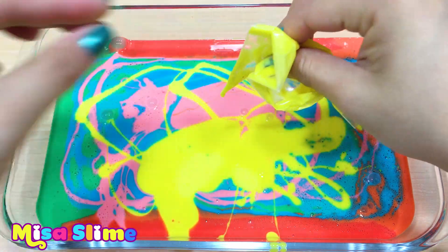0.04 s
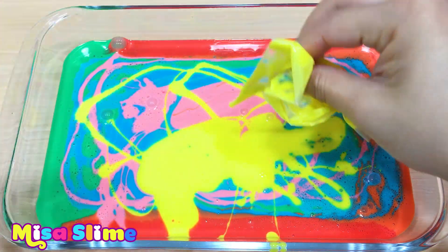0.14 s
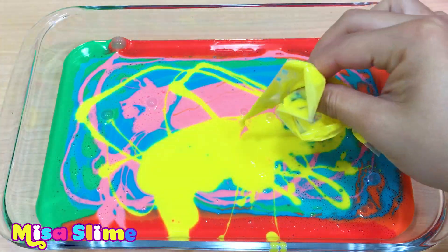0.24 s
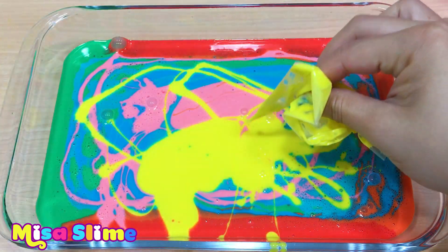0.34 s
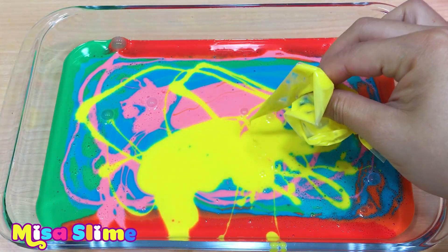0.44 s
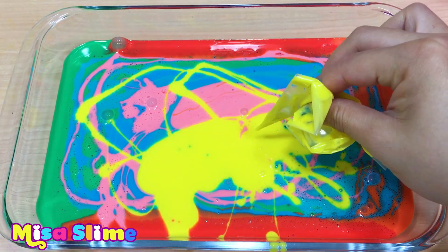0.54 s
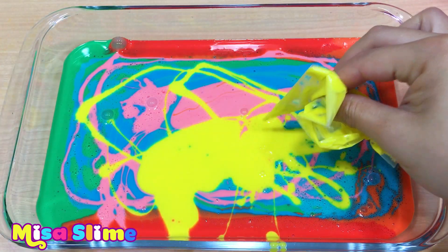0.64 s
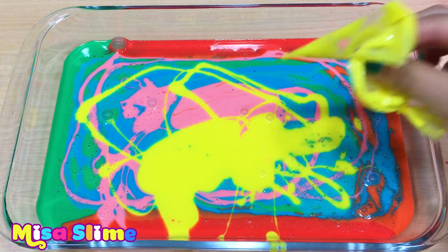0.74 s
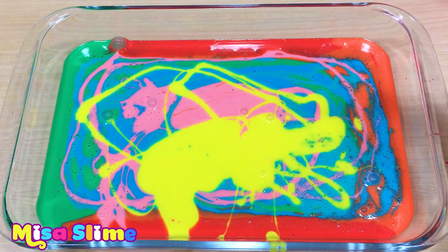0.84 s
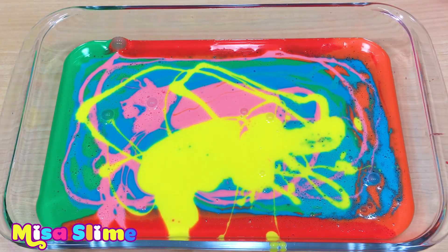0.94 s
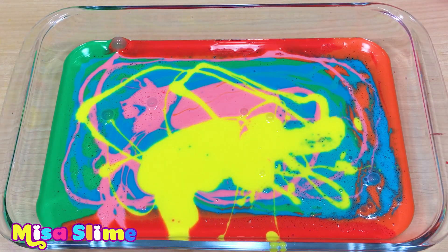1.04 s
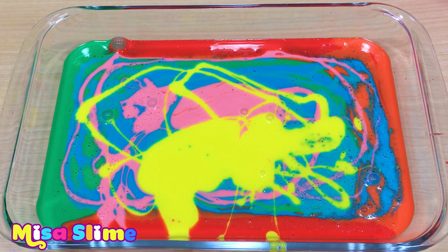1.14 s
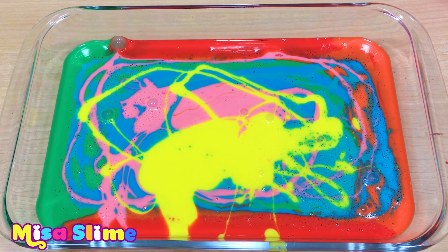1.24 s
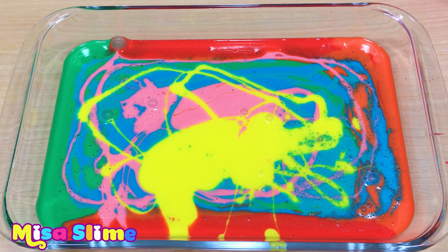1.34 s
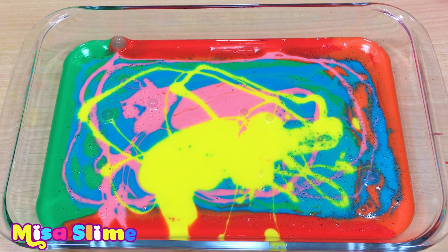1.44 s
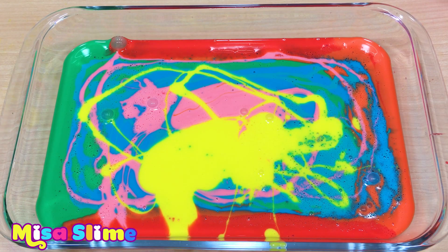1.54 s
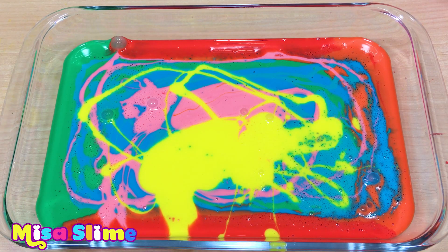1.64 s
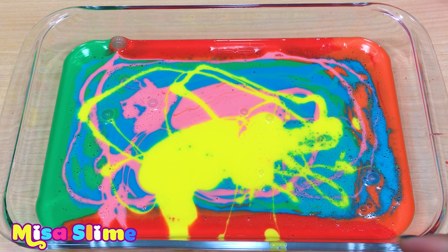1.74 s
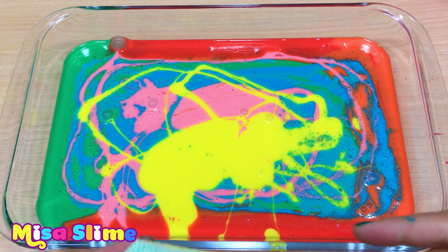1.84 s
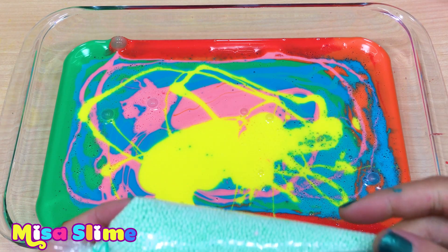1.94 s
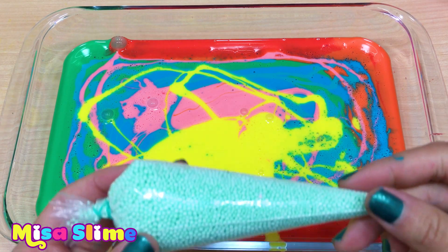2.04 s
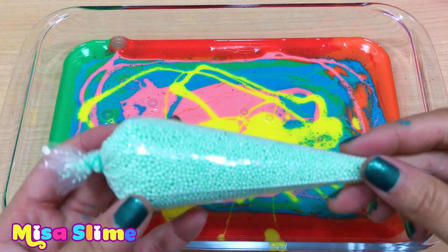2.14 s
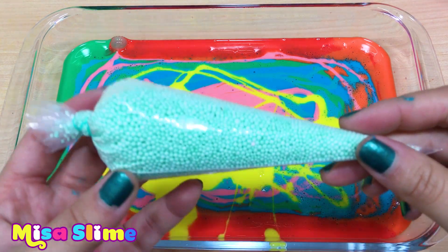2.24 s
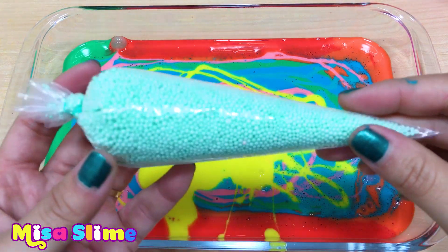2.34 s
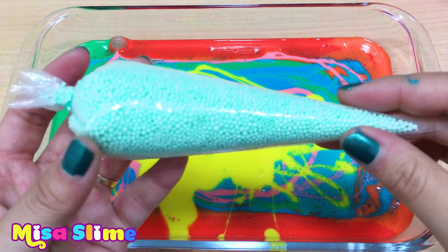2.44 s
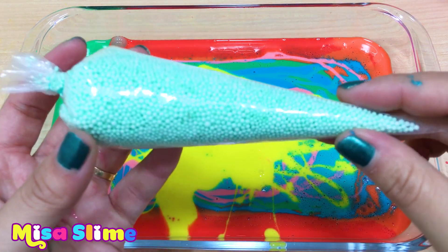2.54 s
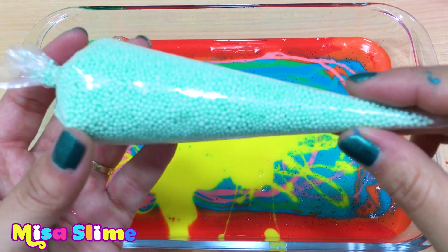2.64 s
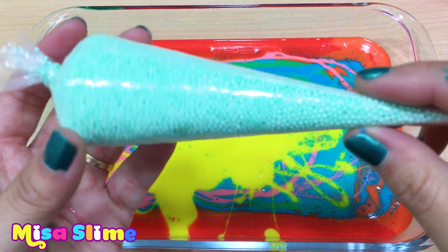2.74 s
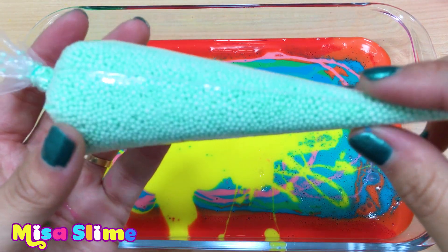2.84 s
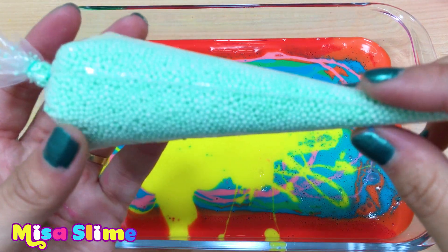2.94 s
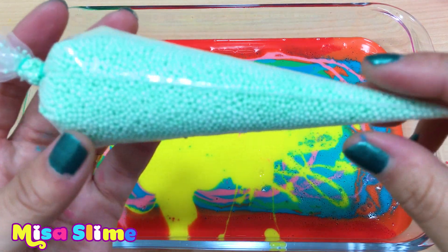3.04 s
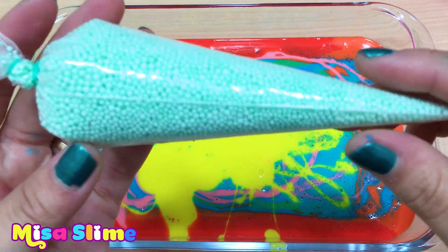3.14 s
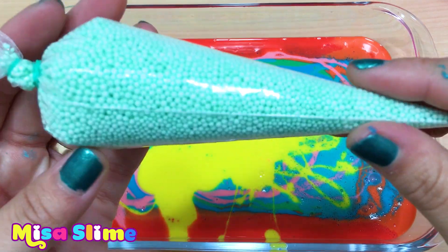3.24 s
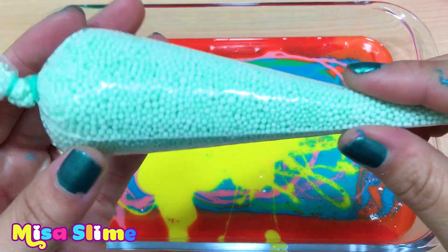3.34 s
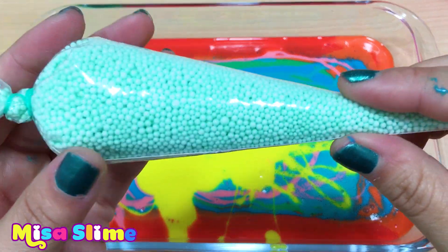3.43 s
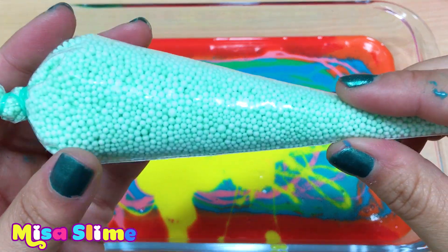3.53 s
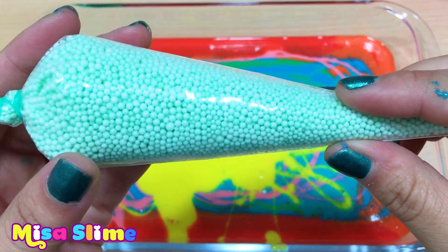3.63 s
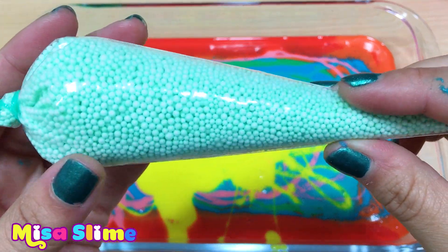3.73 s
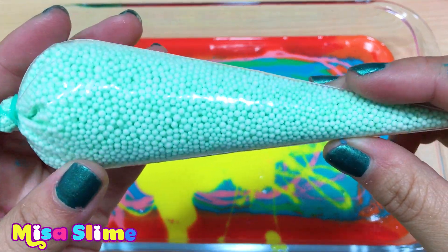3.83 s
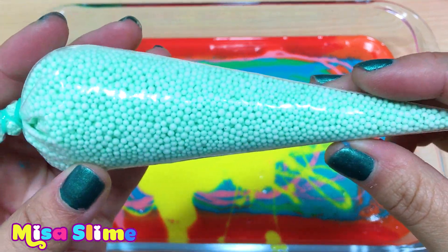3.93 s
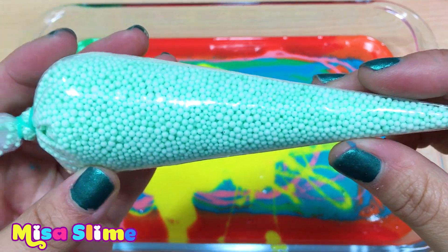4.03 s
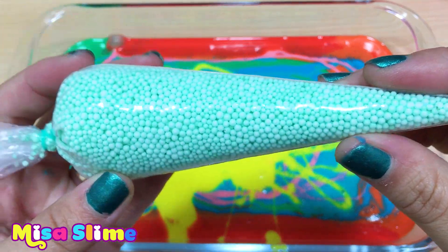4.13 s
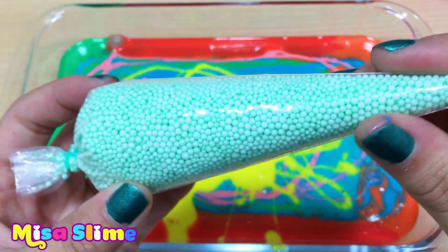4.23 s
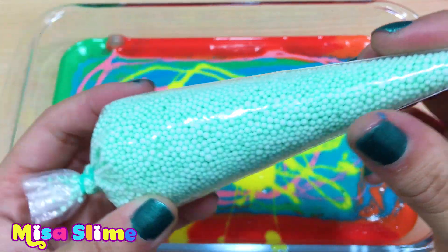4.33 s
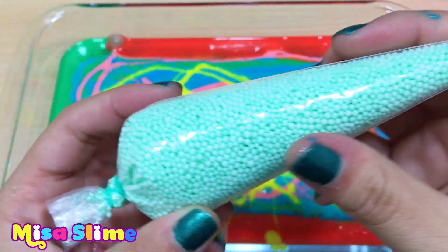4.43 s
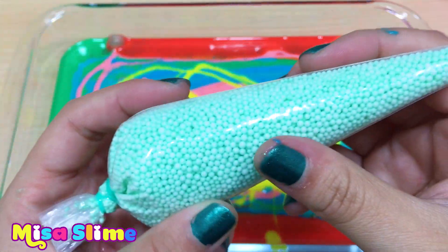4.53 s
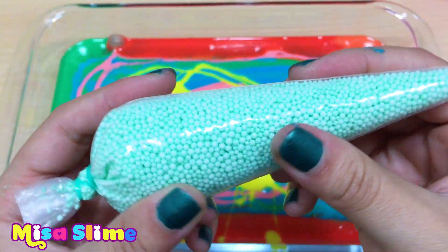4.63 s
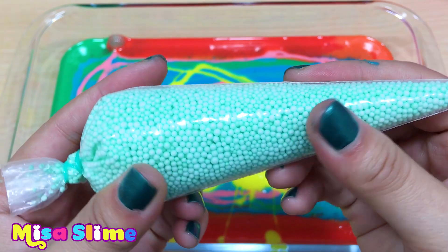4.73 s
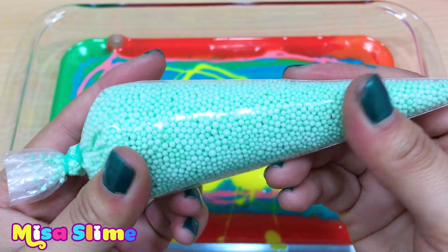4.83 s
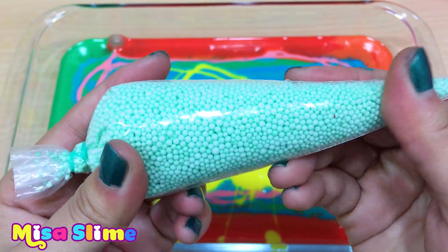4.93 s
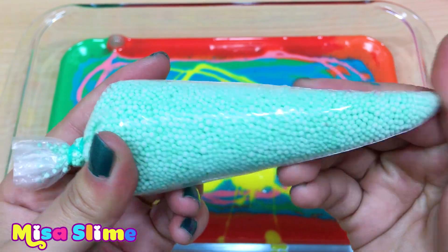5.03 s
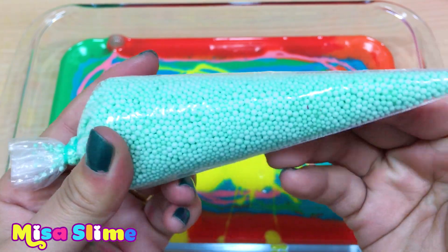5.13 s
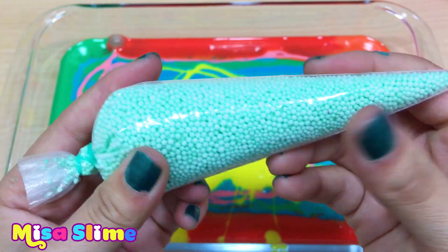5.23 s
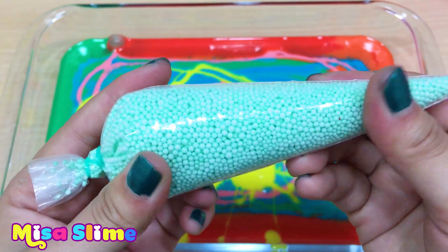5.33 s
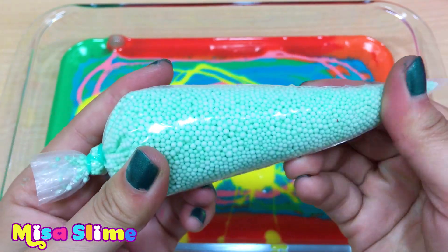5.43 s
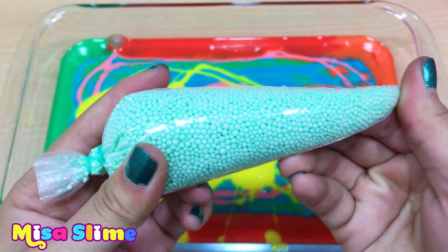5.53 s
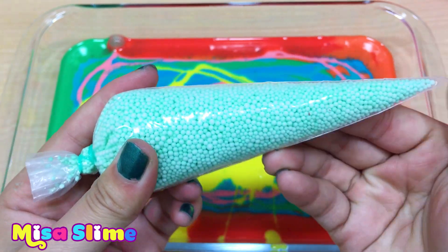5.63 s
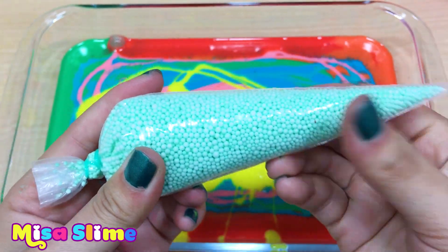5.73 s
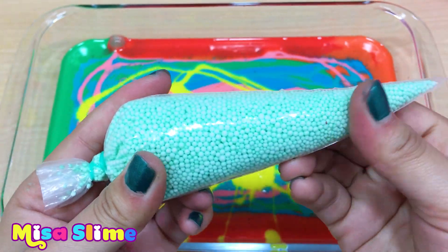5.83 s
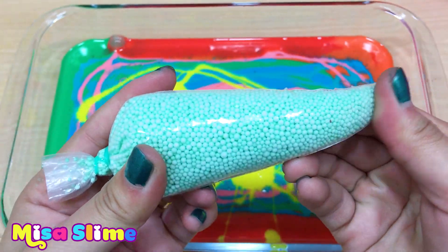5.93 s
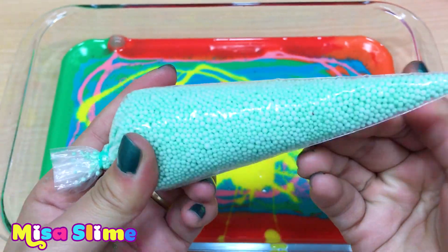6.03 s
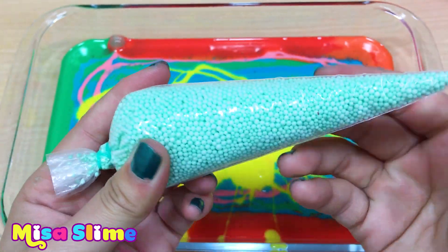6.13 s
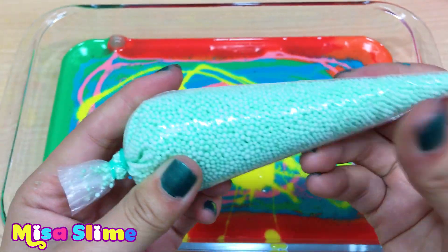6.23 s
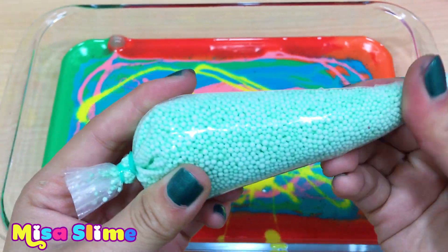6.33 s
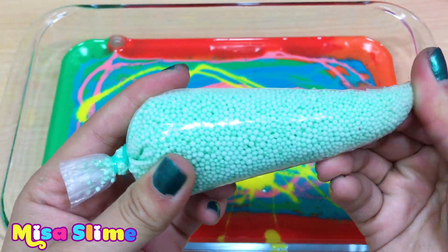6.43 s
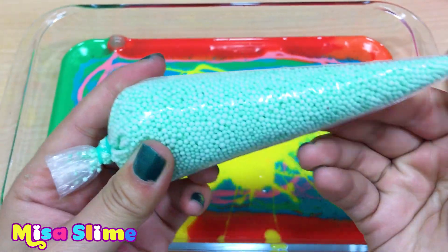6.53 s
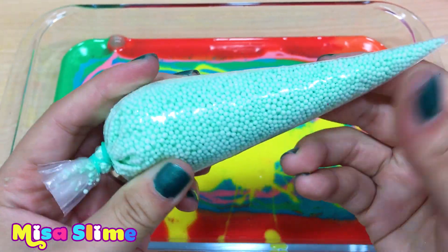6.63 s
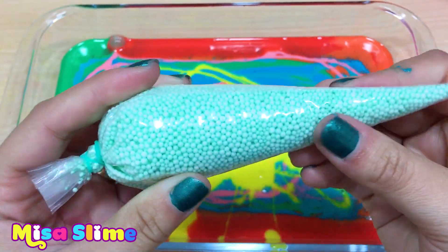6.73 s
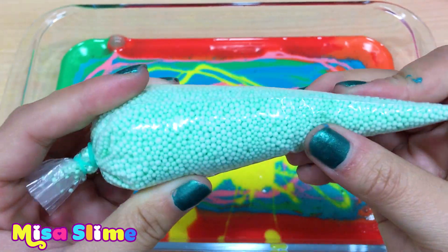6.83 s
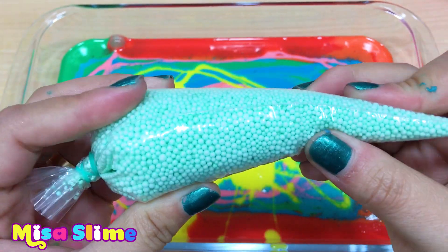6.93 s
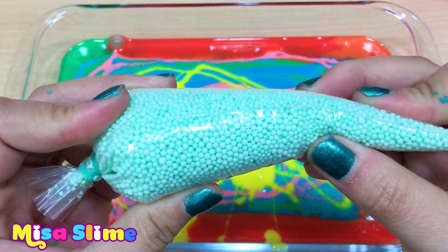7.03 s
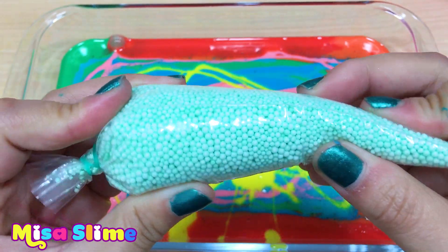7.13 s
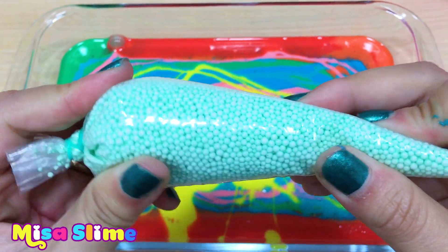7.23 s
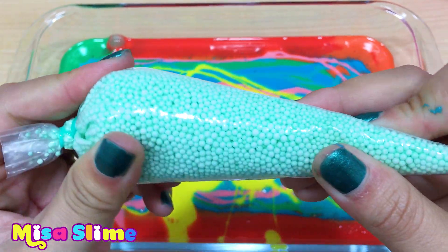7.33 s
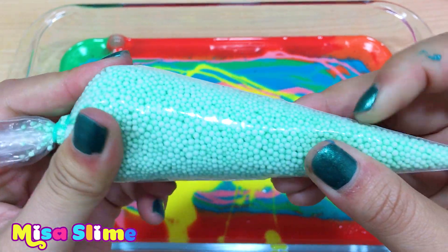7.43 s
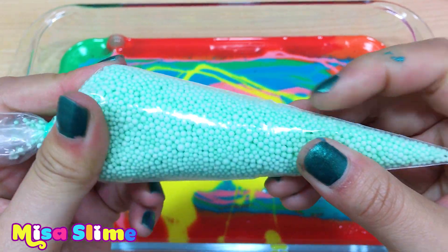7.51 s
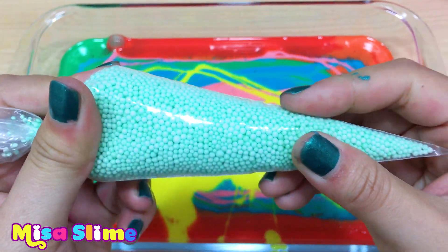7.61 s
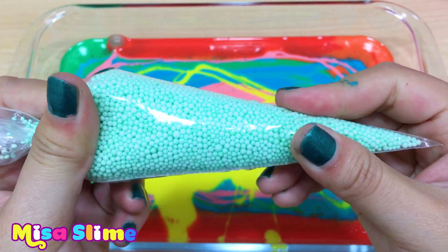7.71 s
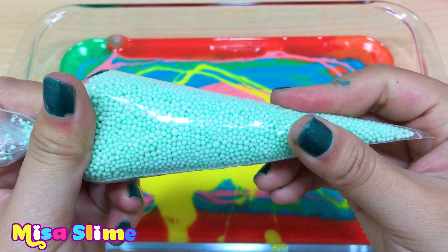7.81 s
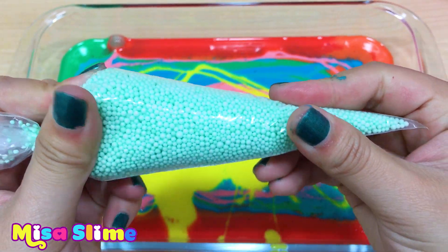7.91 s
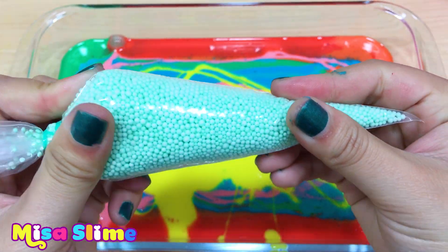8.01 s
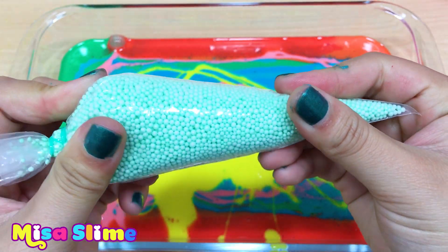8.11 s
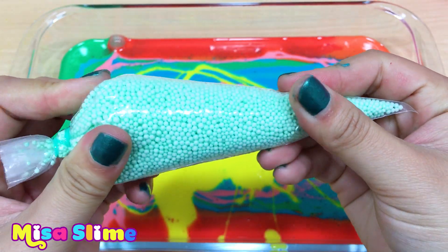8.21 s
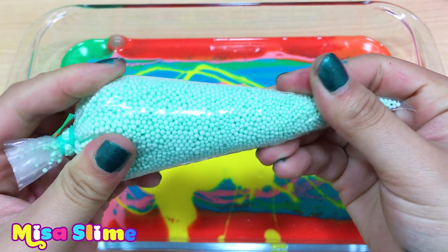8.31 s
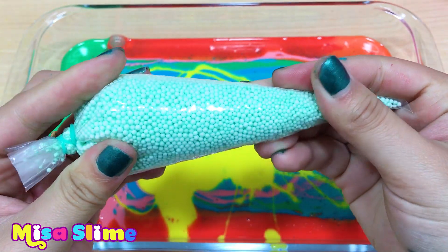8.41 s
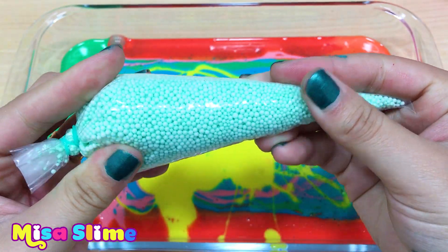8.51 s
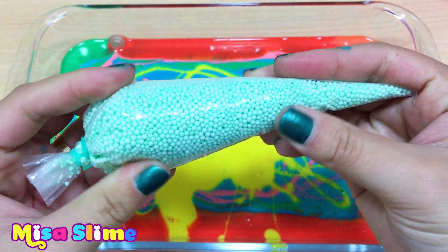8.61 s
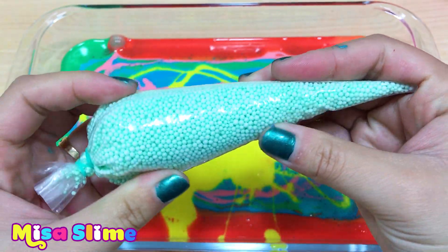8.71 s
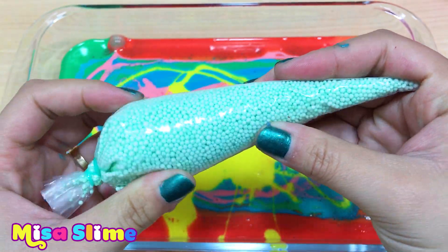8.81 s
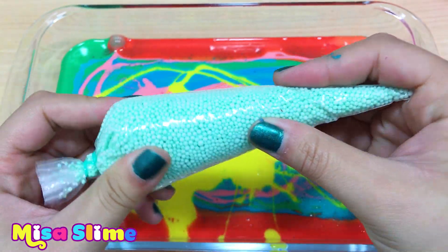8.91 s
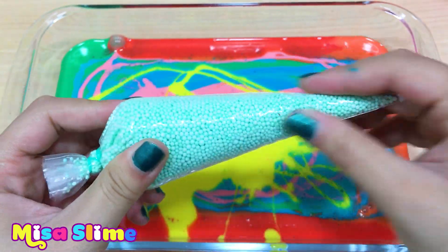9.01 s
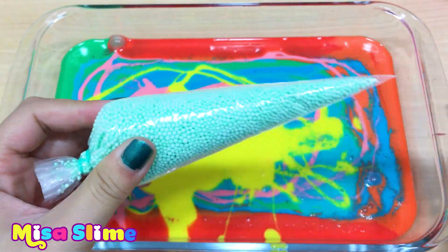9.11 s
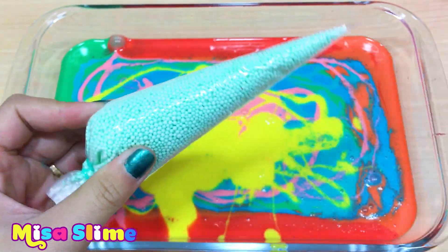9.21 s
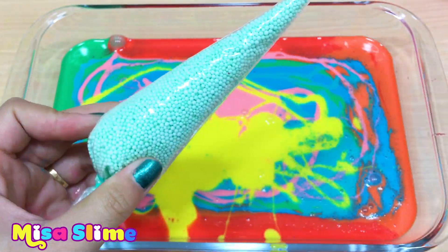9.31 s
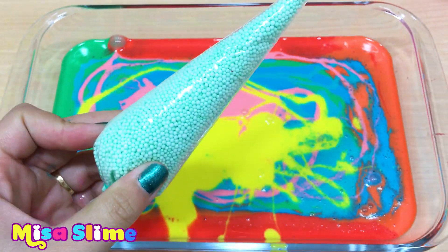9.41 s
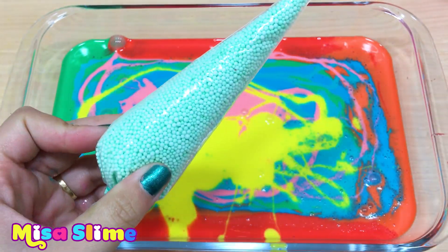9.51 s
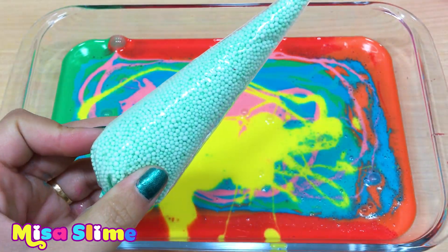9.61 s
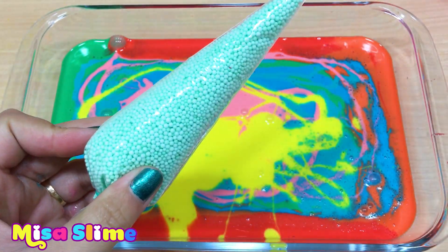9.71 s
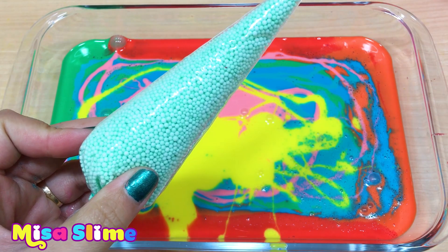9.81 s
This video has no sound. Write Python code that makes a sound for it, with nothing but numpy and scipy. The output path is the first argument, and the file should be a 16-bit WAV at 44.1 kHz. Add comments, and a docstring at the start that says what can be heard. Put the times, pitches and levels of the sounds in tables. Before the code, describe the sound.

A close, mostly dry sound in a small, quiet room with very faint steady air. From 0 to 0.5 s, an emptied thin plastic bag gives faint crisp crackles and tiny skids, then near silence, with only whisper-soft brushes around 1.3 and 1.6 s. At 2.3-2.6 s a packed bead bag arrives with a light rustle and short squeaky skids; sparse soft strokes continue to 4 s. From 4 s the crinkling becomes denser and brighter, with gritty foam-bead crunch, squeaks and sharp snaps. A loud, short hollow thump with a scrape hits at 5.3 s, lesser knocks at 5.4 and 5.8, then strong pops at 6.24, 6.42 and 6.71, with a bright crack near 6.1. A narrow ringing squeak peaks around 7.1. From 7.4 to 9.5 busy crackle and rubbing continue, with a brief low groan of shifting beads at 9.3. Rubbing cuts off at 9.6, leaving quiet and a faint dull rumble.

```python
"""Foam beads crunch and squeak inside taut plastic film as hands, close up, put away an emptied piping bag,
then turn and squeeze a packed one. Friction is shaped noise grains; the film crackles with tiny decaying sines.
Creases snap as noise cracks with ringing facets; a slipping finger is a hollow, pitch-dropping thump and a scrape.
Short skids, a narrow bag resonance and low rumbles are filtered noise.
A small, quiet room adds a decaying noise reverb and steady air."""
import sys
import numpy as np
from scipy import signal
from scipy.fft import rfft, irfft, next_fast_len
from scipy.io import wavfile
from scipy.ndimage import uniform_filter1d, map_coordinates

SR = 44100
rng = np.random.default_rng(int(sys.argv[2]) if len(sys.argv) > 2 else 0)


def wav_record(signal):
    """Record a signal, one row per channel, as 16-bit PCM in the file named by sys.argv[1]."""
    frames = np.transpose(np.atleast_2d(signal))
    bounded = np.clip(frames, -1, 1)
    # unit amplitude maps onto the largest positive 16-bit level
    quanta = np.round(bounded * 32767).astype(np.int16)
    wavfile.write(sys.argv[1], SR, quanta)


N = 434826  # length in samples

# Room air spectrum. Each row: frequency in Hz, relative level in dB.
AIR_SPECTRUM = [(13, -64), (22, -32), (36, -9), (59, -3), (132, -8), (152, -9), (200, -11), (524, -18),
                (730, -22), (792, -23), (3420, -31), (5030, -29.5), (6100, -34.5), (7810, -32.5),
                (16000, -42.5)]
AIR_DB = -65.5
# Reverb decay. Each row: frequency in Hz, time to fall 60 dB in seconds.
ROOM_DECAY = [(100, 0.86), (300, 0.72), (2000, 0.51), (6000, 0.27), (15000, 0.084)]
# Colour of the wall reflections. Each row: frequency in Hz, relative level in dB.
WALL_COLOUR = [(60, -21), (150, -1.5), (230, -5), (380, 1.5), (600, 1.5), (900, 3), (1800, 1), (5000, 1.5),
               (15000, -4)]

# Hands shift with a dull rumble. Each row: middle in seconds, level in dB, half length in seconds.
SHIFTS = [(4.25, -69, 0.47), (5.92, -61, 0.15), (7.195, -63, 0.24), (7.75, -67, 0.38), (9.726, -61, .18)]
# The whole bead packing gives way with a groan: middle in seconds, level in dB, half length in seconds.
SLUMP = (9.315, -51.5, 0.046)
# Rumble of the shifting hands. Each row: frequency in Hz, relative level in dB per Hz.
RUMBLE_SPECTRUM = [(30, -33), (60, -2), (120, 5), (170, -14.5), (400, -32), (2000, -38)]
# Groan of the slumping beads. Each row: frequency in Hz, relative level in dB per Hz.
GROAN_SPECTRUM = [(100, -26), (230, -3), (480, -0.5), (800, -10), (1500, -2), (4000, -37)]

# The packed bag's narrow resonance, higher as it is squeezed tighter.
# Each row: time in seconds, level in dB, centre frequency in Hz.
BAG_RING = [(0, -105, 2780), (1.3, -86, 2750), (2.35, -77.5, 2685), (2.8, -81, 2750), (3.03, -74.5, 2780),
            (3.4, -75.5, 2733), (4.7, -64, 2776), (5.4, -75, 2795), (6.8, -77, 2950), (7.12, -59, 3046),
            (7.3, -73, 3060), (9.3, -73.5, 3060), (9.7, -97, 3120)]
BAG_LOWPASS_HZ, BAG_FLICKER_DB = 230, 4  # reach to either side of the centre, depth of the flicker

# The film skids and chatters.
# Each row: middle in seconds, level in dB, ringing frequency in Hz, half length in seconds.
SKIDS = [(0.086, -61, 4970, 0.036), (0.103, -67, 3830, 0.03), (0.163, -64.5, 2420, 0.017),
         (2.394, -59, 2640, 0.016), (2.525, -56, 4300, 0.0058), (2.555, -52.5, 4160, 0.0073),
         (3.155, -56.5, 2750, 0.006), (4.848, -51, 4700, 0.025), (5.429, -39, 4630, .0015),
         (5.831, -41.5, 3450, 0.0022), (7.04, -48, 7700, 0.026), (7.657, -44, 4150, 0.0069),
         (7.684, -38, 3160, 0.0077), (9.214, -49.5, 1780, 0.011), (9.307, -43, 2900, .012)]

# A finger slips off a bag or knocks it. Each row: release in seconds, thump level in dB, settled pitch in Hz,
# decay constant in seconds, hollow overtone level in dB, scrape level in dB, slide build-up in seconds.
THUMPS = [(0.4541, -53, 254, 0.0014, -43, -81, .004), (5.3008, -13.5, 310, 0.0011, -59, -24.5, 0.012),
          (5.4281, -33.5, 656, 0.00072, -51, -33.5, 0.014), (5.8312, -38, 263, 0.0026, -61, -29.5, 0.026),
          (6.2416, -15, 211, 0.0018, -16.5, -22.5, 0.014),
          (6.421, -17.5, 290, 0.0012, -16.5, -23.5, 0.0064), (6.7116, -15, 209, 0.0015, -21, -21.5, 0.0093)]
# Scrape of the slipping finger. Each row: frequency in Hz, relative level in dB per Hz.
SCRAPE_SPECTRUM = [(150, 4.5), (700, 1.5), (2000, 4.5), (4000, 4), (5600, -7.5), (7500, 4), (11000, -2),
                   (12500, -2), (16000, 2.5)]
SETTLE_DB, SETTLE_S = -41.5, 0.17  # beads resettle after a thump: level relative to it, decay constant

# The loudest creases snapping through.
# Each row: time in seconds, crack level in dB, pitch of the buckling facet in Hz, facet ring level in dB.
SNAPS = [(0.0403, -50, 4020, -50), (0.1008, -70, 4800, -47.5), (0.146, -63, 3780, -56.5),
         (0.2081, -50.5, 3940, -52.5), (0.2838, -49.5, 2350, -58), (0.3697, -64, 1720, -62),
         (0.455, -69, 2200, -51), (2.9918, -52.5, 3010, -58), (3.0223, -50, 2730, -54),
         (3.126, -75, 2736, -57), (3.155, -56, 2720, -57), (4.0573, -37, 2980, -43.5),
         (4.133, -54, 8240, -47), (4.2758, -47, 3630, -48), (4.4875, -42, 3620, -54),
         (4.509, -32.5, 3100, -37), (4.83, -36.5, 4300, -44), (4.8397, -53, 6170, -33.5),
         (5.1785, -42, 6100, -41), (5.2132, -59, 11460, -44), (5.4292, -42, 2070, -34),
         (5.5312, -41.5, 1200, -45), (5.6154, -47, 6120, -60), (5.852, -44, 3240, -48.5),
         (6.0051, -42.5, 1040, -47.5), (6.0354, -47, 2330, -54), (6.122, -25.5, 7500, -27.5),
         (6.523, -48, 2560, -44), (6.6271, -46, 1710, -48.5), (6.8219, -34, 1960, -25.5),
         (6.842, -37, 1490, -32.5), (6.9383, -49, 1477, -46.5), (7.022, -34.5, 8000, -39),
         (7.0288, -43, 8200, -30), (7.0342, -38, 7410, -50), (7.0626, -44, 6060, -38),
         (7.4112, -44.5, 7500, -45), (7.4893, -37, 5900, -36), (7.803, -43.5, 7410, -49),
         (7.8677, -42.5, 7490, -49), (7.9224, -41, 4530, -36), (7.9327, -37, 9350, -46),
         (7.9954, -40, 7030, -46), (8.0207, -42.5, 10680, -44), (8.0443, -32.5, 4250, -34.5),
         (8.0598, -45, 3620, -56), (8.1399, -44, 5100, -44), (8.1933, -41, 7970, -37.5),
         (8.2972, -58, 6460, -44), (8.4139, -47, 6800, -45.5), (8.574, -37.5, 3620, -41.5),
         (8.5275, -44, 8480, -41), (8.6241, -59, 1040, -50.5), (8.652, -42, 8050, -42),
         (8.6835, -44, 3860, -48.5), (8.6912, -65, 1070, -51.5), (8.9392, -45, 3880, -47),
         (8.958, -39, 3880, -44), (8.9661, -36, 3960, -42.5), (9.0085, -54, 1800, -35.5),
         (9.0285, -38.5, 2000, -37.5), (9.1482, -37.5, 1930, -41.5), (9.2746, -34, 1820, -37.5),
         (9.2984, -35, 10510, -42), (9.307, -40, 3930, -35), (9.3437, -36, 4060, -40),
         (9.4177, -49, 6540, -37.5), (9.4242, -39, 6400, -38.5), (9.4286, -36, 5600, -38),
         (9.4326, -40, 3980, -39)]
# Colour of the cracks. Each row: frequency in Hz, relative level in dB per Hz.
CRACK_SPECTRUM = [(150, -19), (700, -34), (1500, -4), (4000, 3.5), (5600, -3), (7400, 6), (9000, -2.5),
                  (10700, 5), (12400, -1), (13600, -10), (16000, 3)]
# Lesser creases go at random times, at levels that follow the film rub.
TICKS_PER_S, TICK_OVER_RUB_DB, TICK_SPREAD_DB = 8, -2.5, 2.5
TICK_LOW_HZ, TICK_HIGH_HZ = 2000, 9800

# The film's steady rub in the holding hand. Each row: time in seconds, level before the film trim in dB.
GRIP = [(0, -66.5), (0.4, -77.5), (1.2, -83.5), (2.2, -78), (2.5, -63.5), (2.7, -74), (3.3, -70.5),
        (4.2, -59.5), (5.1, -58), (5.45, -62), (5.95, -62), (6.9, -57.5), (7.28, -58), (7.8, -52),
        (8.15, -59.5), (8.9, -53), (9.4, -53.5), (9.59, -62.5)]
RUB_END_S = 9.6  # the steady rub cuts off here, in a 10 ms fade
# A finger slides along the film.
# Each row: start in seconds, length in seconds, level before the film trim in dB, bead pressure in dB.
STROKES = [(0.02, 0.069, -83, 7), (0.46, .07, -83, 19.5), (1.334, 0.076, -73.5, 7.5),
           (1.604, 0.24, -74.5, 5), (2.276, 0.083, -66, -9), (2.386, .03, -60.5, 6),
           (2.527, 0.047, -58.5, 0.5), (2.92, .015, -67, 4), (2.987, 0.037, -65, 3), (3.215, .015, -69, -6),
           (3.514, 0.069, -58.5, -1.5), (3.614, 0.065, -65, -6), (3.776, 0.052, -59, 2.5),
           (3.926, .07, -76, -15), (4.048, 0.014, -57, -1), (4.393, .04, -55.5, 2.5),
           (4.467, 0.07, -53.5, 4), (4.605, 0.12, -59.5, 2), (4.697, 0.075, -52, -2.5),
           (4.835, 0.029, -46.5, -2), (4.887, 0.16, -50.5, -1.5), (5.056, 0.15, -54.5, -22),
           (5.24, .03, -52.5, -2), (5.272, 0.022, -44.5, 2), (5.527, 0.089, -57.5, 3),
           (5.697, 0.15, -58, 0), (6.12, 0.079, -49, -18), (6.222, 0.019, -44, 1.5), (6.361, 0.066, -55, 4),
           (6.511, 0.022, -52, 7), (6.555, 0.05, -56.5, -6), (6.696, 0.017, -46.5, -3),
           (6.815, 0.054, -53.5, 8), (6.914, 0.12, -54, 7), (7.035, 0.036, -45.5, 4),
           (7.08, 0.13, -53.5, 0.5), (7.333, 0.058, -53, -1), (7.414, 0.099, -50, 0),
           (7.612, 0.081, -46, 2), (7.725, 0.15, -57, -2), (7.9, 0.059, -48.5, -5),
           (7.995, 0.031, -50, -17), (8.247, 0.077, -63, -23), (8.45, .1, -52.5, -16),
           (8.546, 0.066, -52, -4), (8.782, .12, -52, 1.5), (8.926, 0.072, -51.5, 2),
           (9.094, 0.077, -51.5, 2.5), (9.204, .025, -45.5, 1.5), (9.262, 0.058, -45, 2.5),
           (9.422, 0.035, -54.5, 3)]
STROKE_ATTACK_S, STROKE_RELEASE_S = 0.0083, 0.016
SQUEAK_DB, CRUNCH_DB = -9, -14  # relative to the untrimmed film gain, at neutral pressure
CRUNCH_GROWS = 0.91  # dB of crunch per dB of pressure
# Rub of the film. Each row: frequency in Hz, relative level in dB per Hz.
FILM_SPECTRUM = [(200, -36.5), (1200, -11.5), (2500, -13.5), (4000, -4.5), (5000, -7), (5800, -5),
                 (7200, 1.5), (9000, -3), (11000, 0.5), (12500, -6.5), (13500, -2.5), (16000, -6.5)]
# Beads squeaking on each other. Each row: frequency in Hz, relative level in dB per Hz.
SQUEAK_SPECTRUM = [(1000, -50.5), (1900, -8.5), (2350, -9.5), (2900, -5.5), (4200, -8.5), (6000, -9),
                   (12000, -67)]
# Beads crunching together. Each row: frequency in Hz, relative level in dB per Hz.
CRUNCH_SPECTRUM = [(100, -11.5), (400, -5.5), (800, -5.5), (1200, -2.5), (1800, 0.5), (2300, -4),
                   (3500, -3), (7000, -16), (14000, -64)]
# Sheen on the film's top octave. Each row: time in seconds, gain in dB.
SHEEN = [(0, -5), (.6, 2), (2.3, 4.5), (2.9, -2), (4.15, 0), (4.75, -2), (5.25, 1.5), (5.75, 2.5),
         (6.15, -3), (6.6, 4), (7.05, -3), (8.3, 4), (9.25, 0), (9.52, -9)]

LOW_CUT_HZ, TOP_HZ = 45, 16300  # limits of the finished sound


def amp(db):
    """Decibels to gain."""
    return 10 ** (np.asarray(db) / 20)


def unit(x):
    """Scale x to rms 1."""
    return x / np.sqrt(np.mean(x ** 2) + 1e-20)


def along(points, hz):
    """Read (Hz, value) points on a log frequency axis."""
    point_hz, values = np.transpose(points)
    return np.interp(np.log(hz + 1), np.log(point_hz), values)


def curves(rows):
    """Draw one automation curve, sample by sample, for each column after the time."""
    s, *columns = np.transpose(rows)
    return [np.interp(np.arange(N) / SR, s, column) for column in columns]


def wobble(rate):
    """A smooth random curve with this many knots a second."""
    knots = rng.standard_normal(N // 10)
    return map_coordinates(knots, [np.arange(N) * rate / SR], mode="wrap")


def bell(s, db, half):
    """A smooth swell and fade of gain around time s."""
    distance = (np.arange(N) / SR - s) / half
    return amp(db) * np.exp(-np.minimum(distance ** 2, 40))


def highpass(x, hz):
    """Roll off the lows at 12 dB an octave."""
    return signal.sosfilt(signal.butter(2, hz, "highpass", fs=SR, output="sos"), x)


def coloured(x, points, size=8192):
    """Filter x causally to this spectrum, at unit power gain."""
    log_gain = np.log(amp(along(points, np.fft.rfftfreq(size, 1 / SR))))
    # folding the cepstrum forward gives minimum phase, so transients stay sharp
    cepstrum = irfft(log_gain)
    cepstrum[1:size // 2] *= 2
    cepstrum[size // 2 + 1:] = 0
    response = irfft(np.exp(rfft(cepstrum)))
    return signal.fftconvolve(x, response / np.linalg.norm(response))[:len(x)]


def add(track, s, sound):
    """Mix a sound into the track at time s."""
    start = max(round(s * SR), 0)
    track[start:start + len(sound)] += sound[:max(N - start, 0)]


def burst(x):
    """Scale x to the energy of three milliseconds at rms 1."""
    return x * np.sqrt(.003 * SR / np.sum(x ** 2))


def air():
    """Steady room rumble and faint hiss from coloured noise."""
    return amp(AIR_DB) * unit(coloured(rng.standard_normal(N), AIR_SPECTRUM))


def room(x):
    """The walls answer 5 ms later with diffuse noise, each frequency dying at its own speed."""
    hz, t, z = signal.stft(rng.standard_normal(SR * 3 // 4), SR, nperseg=256)
    decay = amp(-60 * t / along(ROOM_DECAY, hz)[:, None])
    tail = signal.istft(z * decay, SR, nperseg=256)[1]
    tail = coloured(np.pad(tail, (SR // 200, 0)), WALL_COLOUR)
    return signal.fftconvolve(x, tail / np.linalg.norm(tail))[:N]


def shifting():
    """The hands rumble as they change hold, and the bead packing slumps once with a groan."""
    rumble = sum(bell(*shift) for shift in SHIFTS) * coloured(rng.standard_normal(N), RUMBLE_SPECTRUM)
    groan = bell(*SLUMP) * coloured(rng.standard_normal(N), GROAN_SPECTRUM)
    return rumble + groan


def resonance():
    """Rubbing fitfully excites one narrow bag resonance: slow noise carried on a gliding pitch."""
    db, hz = curves(BAG_RING)
    lowpass = signal.butter(2, BAG_LOWPASS_HZ, fs=SR, output="sos")
    drive = signal.sosfilt(lowpass, rng.standard_normal((2, N)))
    phase = 2 * np.pi * np.cumsum(hz) / SR
    ring = drive[0] * np.cos(phase) + drive[1] * np.sin(phase)
    flicker = amp(BAG_FLICKER_DB * wobble(18))
    return amp(db) * unit(flicker * ring)


def skids(sharpness=5.7):
    """A short swell of friction noise excites one resonance of the stretched film."""
    track = np.zeros(N)
    t = np.arange(-SR // 16, SR // 16) / SR
    for s, db, hz, half in SKIDS:
        swell = np.exp(-(t / half) ** 2)
        ring = signal.lfilter(*signal.iirpeak(hz, sharpness, SR), swell * rng.standard_normal(len(t)))
        add(track, s + t[0], amp(db) * unit(ring) * np.sqrt(np.mean(swell ** 2)))
    return track


def thumps(stiffening=0.69, relax=0.00089, slide_db=-15, grip=0.00083, release=0.0017,
           hollow_hz=980, hollow_life=0.00068, octave_db=-15):
    """A finger slides ever faster, lets go with a scrape, and the damped bag bounces back; times in seconds."""
    body, scrapes = np.zeros(N), np.zeros(N)
    lead = .15  # seconds of slide ahead of the release
    t = np.arange(SR // 4) / SR - lead
    before, after = np.maximum(-t, 0), np.maximum(t, 0)
    for s, db, hz, decay, hollow_db, scrape_db, slide in THUMPS:
        # the film is tightest at the release, so the pitch starts high
        turns = hz * (after + stiffening * relax * (1 - np.exp(-after / relax)))
        swing = after / decay * np.exp(1 - after / decay)
        hollow = np.sin(2 * np.pi * hollow_hz * after) * np.exp(-after / hollow_life)
        # the bag is stiffer when squeezed than when it springs out, which adds the octave
        octave = amp(octave_db) * swing * np.sin(4 * np.pi * turns)
        bounce = np.sin(2 * np.pi * turns) + octave
        add(body, s - lead, amp(hollow_db) * hollow - amp(db) * swing * bounce)
        build_up = np.exp(-before / grip) + amp(slide_db) * np.exp(-before / slide)
        friction = build_up * np.exp(-after / release)
        add(scrapes, s - lead, amp(scrape_db) * friction * rng.standard_normal(len(t)))
    return body + coloured(scrapes, SCRAPE_SPECTRUM)


def ticks(slide):
    """Rows like those of SNAPS for lesser creases, their levels following the rub of their moment."""
    when, pitch, size = rng.random((3, int(TICKS_PER_S * N / SR)))
    rub_db = 20 * np.log10(slide[(when * N).astype(int)] + 1e-6)
    db = rub_db + TICK_OVER_RUB_DB + TICK_SPREAD_DB * np.minimum(-np.log(size), 2)
    hz = TICK_LOW_HZ * (TICK_HIGH_HZ / TICK_LOW_HZ) ** pitch
    return list(zip(when * N / SR, db, hz, db))


def snaps(creases, flutter_db=-11, flutter_life=0.0019, overtone=2.15, overtone_db=-10,
          rattle=0.17, rattle_life=0.0015, thin_hz=750, loss_hz=8000):
    """Each crease gives a sharp noise crack and rings its small facet of film for a few cycles."""
    cracks, rings = np.zeros(N), np.zeros(N)
    t = np.arange(SR // 50) / SR
    crack_life, ring_cycles = .00035, 1.3  # decay constants in seconds and in cycles
    for s, crack_db, hz, ring_db in creases:
        crack_noise, rattle_noise = rng.standard_normal((2, len(t)))
        crack_decay = np.exp(-t / crack_life) + amp(flutter_db) * np.exp(-t / flutter_life)
        add(cracks, s, amp(crack_db) * burst(crack_noise * crack_decay))
        # the film soaks up the overtones of its smallest facets
        upper_hz = overtone * hz
        upper_gain = amp(overtone_db) * np.exp(-(upper_hz / loss_hz) ** 2)
        upper = upper_gain * np.sin(2 * np.pi * upper_hz * t)
        facet = (np.sin(2 * np.pi * hz * t) + upper) * np.exp(-t * hz / ring_cycles)
        # the facet jumps once, then flutters to rest
        push = (t == 0) + rattle * rattle_noise * np.exp(-t / rattle_life)
        add(rings, s, amp(ring_db) * burst(signal.fftconvolve(push, facet)[:len(t)]))
    # so small a facet radiates little bass
    return coloured(cracks, CRACK_SPECTRUM) + highpass(rings, thin_hz)


def rubbing():
    """Gains of film, squeak and crunch: the grip plus each stroke, which rises, holds and dies away."""
    t = np.arange(0, N, 32) / SR
    grip = amp(np.interp(t, *np.transpose(GRIP)))
    grip = grip * np.clip((RUB_END_S - t) * 100, 0, 1)  # 10 ms fade
    power = np.array([grip, grip * amp(SQUEAK_DB), grip * amp(CRUNCH_DB)]) ** 2
    for start, length, db, pressure_db in STROKES:
        rise = np.maximum(start - t, 0) / STROKE_ATTACK_S
        fall = np.maximum(t - start - length, 0) / STROKE_RELEASE_S
        squeak_db = SQUEAK_DB + pressure_db
        crunch_db = CRUNCH_DB + CRUNCH_GROWS * pressure_db
        gains = amp(db + np.array([0, squeak_db, crunch_db]))
        power += np.outer(gains, np.exp(-rise - fall)) ** 2
    for s, db, *_ in THUMPS:
        settling = (t > s) * amp(db + SETTLE_DB) * np.exp(-abs(t - s) / SETTLE_S)
        power[2] += settling ** 2
    return curves(np.column_stack([t, *np.sqrt(power)]))


def grains(rate, spread_db, life, smooth, clump_db):
    """Tiny stick-slip bursts of uneven size, bunched in time, over a share of smooth friction; rms 1."""
    sizes = amp(spread_db * np.minimum(rng.standard_exponential(N), 4))
    energy = (rng.random(N) < rate / SR) * sizes ** 2
    # energy falls twice as fast as amplitude, whose decay constant is life seconds
    energy = signal.lfilter([1], [1, -np.exp(-2 / (life * SR))], energy)
    share = np.clip(smooth, 0, 1)
    power = share + (1 - share) * energy / energy.mean()
    return unit(np.sqrt(power) * amp(clump_db * wobble(70)) * rng.standard_normal(N))


def crackle(rate=330, centre_hz=8000, scatter=0.27, spread_db=2.5):
    """Countless small facets flip, each at its own pitch and size and gone within a few cycles; rms 1."""
    track, t = np.zeros(N), np.arange(SR // 500) / SR
    for when, pitch, size in rng.random((int(rate * N / SR), 3)):
        hz = min(centre_hz * np.exp(scatter * np.pi * (pitch - .5)), SR / 3)
        db = spread_db * min(-np.log(size), 3)
        add(track, when * N / SR, amp(db) * np.sin(2 * np.pi * hz * t) * np.exp(-t * hz))
    return unit(highpass(track, SR / 14))


def patchy(x, patch_db=1.0, size=128):
    """The rustle's colour shifts as different folds take over, by smoothed random band gains; rms 1."""
    z = signal.stft(x, nperseg=size)[2]
    field = uniform_filter1d(rng.standard_normal(z.shape), size=9, axis=0)  # across frequency
    field = uniform_filter1d(field, size=16, axis=1)  # across time
    return unit(signal.istft(z * amp(patch_db * unit(field)), nperseg=size)[1][:N])


def handling(slide, squeezing, crunching, crackle_db=-4, sheen_hz=10000, unsteady_db=0.7):
    """Film slides on skin and crackles while the beads inside squeak and crunch against each other."""
    rub = grains(rate=520, spread_db=1.5, life=0.0007, smooth=0.44, clump_db=1.4)
    film = patchy(coloured(rub, FILM_SPECTRUM) + amp(crackle_db) * crackle())
    # a zero-phase split lets the top octave ride its own level
    split = signal.butter(2, sheen_hz, "highpass", fs=SR, output="sos")
    top = signal.sosfiltfilt(split, film)
    film = film - top + amp(curves(SHEEN)[0]) * top
    squeak = grains(rate=670, spread_db=5.5, life=0.00054, smooth=0.75, clump_db=2)
    squeak = coloured(squeak, SQUEAK_SPECTRUM)
    crunch = grains(rate=350, spread_db=5, life=0.00091, smooth=0.5, clump_db=1.5)
    crunch = coloured(crunch, CRUNCH_SPECTRUM)
    film_trim = amp(0.2)
    mix = film_trim * slide * film + squeezing * squeak + crunching * crunch
    return amp(unsteady_db * wobble(25)) * mix


def scene():
    """The bags close up, in their room."""
    slide, squeezing, crunching = rubbing()
    bag = shifting() + resonance() + skids() + thumps()
    bag += snaps(list(SNAPS) + ticks(slide))
    bag += handling(slide, squeezing, crunching)
    return (bag + amp(-19.0) * room(bag) + air())[None]


def record(dry):
    """The recorder sheds the deepest bass and keeps nothing above its band limit."""
    low_cut = signal.butter(4, LOW_CUT_HZ, "highpass", fs=SR, output="sos")
    thinned = signal.sosfilt(low_cut, dry)
    size = next_fast_len(N + SR // 2)
    hz = np.fft.rfftfreq(size, 1 / SR)
    passband = np.clip((TOP_HZ - hz) / 700, 0, 1) ** 2  # fades over the last 700 Hz
    return irfft(rfft(thinned, size) * passband, size)[..., :N]


dry = scene()
out = record(dry)
wav_record(out)
```